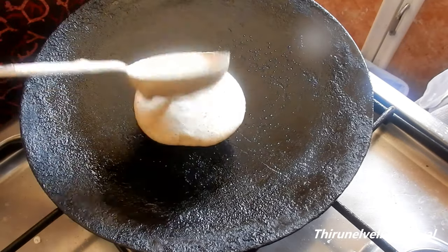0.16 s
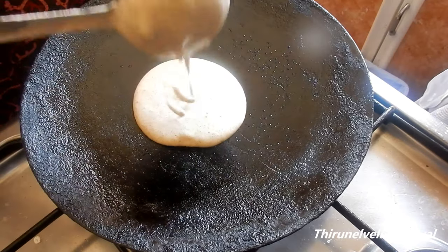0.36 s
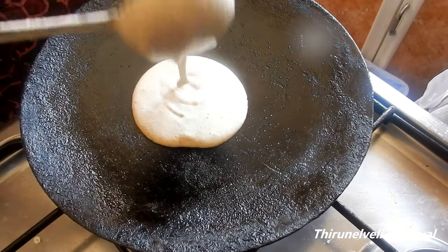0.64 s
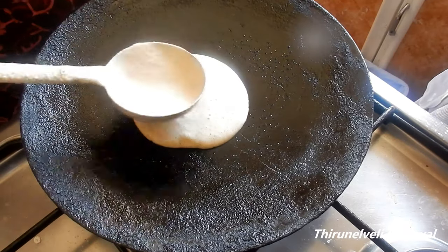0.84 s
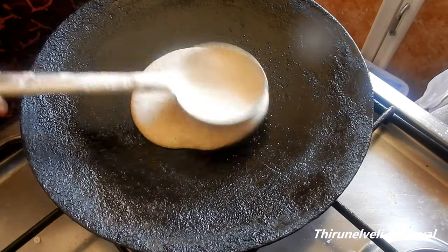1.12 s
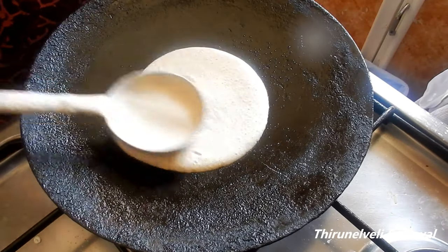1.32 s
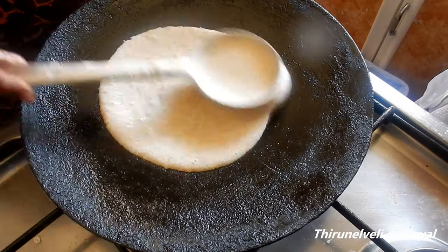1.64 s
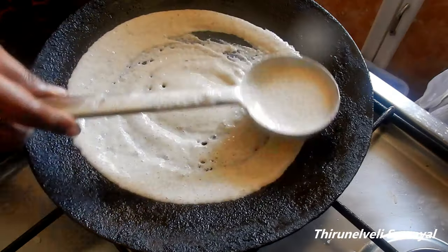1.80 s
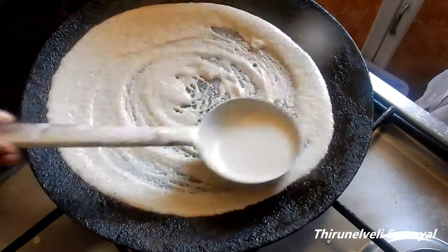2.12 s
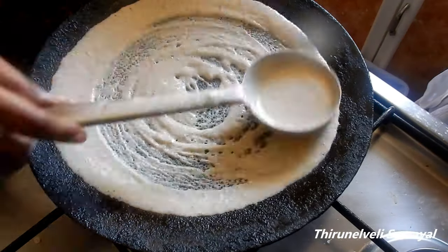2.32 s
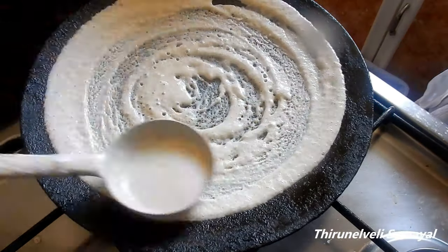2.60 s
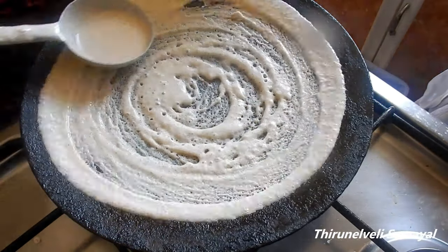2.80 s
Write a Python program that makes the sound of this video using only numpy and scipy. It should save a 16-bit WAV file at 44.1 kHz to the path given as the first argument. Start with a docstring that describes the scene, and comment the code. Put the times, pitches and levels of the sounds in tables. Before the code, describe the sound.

Batter sizzles close by on a hot iron griddle, bubbling and spitting over a low rumble. From about 1.3 seconds the bubbling eases and a fine crackle grows. Near 1.8 seconds the sound cuts out for an instant, returning quieter with a puff of steam. Until about 3 seconds a steel ladle rubs through the hissing batter with faint sliding tones and three short rim scrapes around 2.2 seconds.

```python
"""Wet batter sizzles on a hot iron griddle: countless steam bubbles burst and ring the iron, droplets
spit, a low rumble runs beneath. From about 1.3 s the boil eases and a fine crackle grows.
At 1.77 s the sound breaks off for an instant, then resumes quieter and thinner with a flash of steam:
a steel ladle circles over the batter, rubbing the iron with faint singing glides and short rim
scrapes, while the thin layer hisses."""
import sys
import numpy as np
from scipy import signal
from scipy.fft import rfft, irfft
from scipy.io import wavfile
from scipy.ndimage import uniform_filter1d

SR = 44100
rng = np.random.default_rng(int(sys.argv[2]) if len(sys.argv) > 2 else 0)


def file_out(sig):
    """Save sig as 16-bit WAV at sys.argv[1]."""
    # one column per channel
    cols = np.atleast_2d(sig).T
    # limit, then scale
    lim = np.clip(cols, -1, 1)
    pcm = np.round(lim * 32767).astype(np.int16)
    wavfile.write(sys.argv[1], SR, pcm)


N = 130095

# boil strength (time [s], large bubbles [dB], small bubbles [dB], rumble [dB])
BOIL_LEVELS = [(0, -27, -31, -41), (.09, -27, -33, -40.5), (.31, -26, -32, -39.5), (.45, -29, -35, -43),
               (.62, -28.5, -35.5, -41.5), (.76, -26.5, -34, -38.5), (.88, -29.5, -34.5, -42),
               (1.0, -27.5, -36, -41.5), (1.07, -29, -35.5, -43), (1.24, -27, -34.5, -40),
               (1.35, -31.5, -34, -45), (1.48, -34, -35.5, -48.5), (1.77, -33, -36, -49.5)]


def sizzle():
    """Steam bubbles burst in flurries and ring the iron; small ones fizz above; the boil surges twice."""
    # large-bubble spectrum (frequency [Hz], relative level [dB])
    large_spectrum = [(300, -28.5), (680, -13), (820, -4), (1300, -3), (1480, -4), (2100, -1.5),
                      (3300, -0.5), (3800, -11.5), (5000, -23.5), (9000, -61)]
    # small-bubble spectrum (frequency [Hz], relative level [dB])
    small_spectrum = [(2500, -28), (3900, -4.5), (4400, 0.5), (5800, -2), (7500, -7.5), (10200, -17.5),
                      (12000, -25), (16000, -30)]
    # griddle resonances (frequency [Hz], bandwidth [Hz], gain [dB])
    iron_modes = [(898, 22, -8), (1228, 34, -2.5), (1336, 44, -2), (1688, 48, 1.5), (2100, 51, -1.5),
                  (2330, 17, 5.5), (4300, 75, -6.5)]
    # boiling surges (start [s], length [s], level [dB])
    surges = [(.02, 0.36, -28.5), (.93, .14, -30.5)]
    # surge passband (frequency [Hz], bandwidth [Hz], gain [dB])
    surge_band = [(2220, 870, 0)]
    flurry_db = walk(79.92)
    large = ring(colour(bursts(9000, scatter_db=4, spread=0.039), large_spectrum), iron_modes)
    small = ring(colour(bursts(7000, scatter_db=5.5, spread=0.1), small_spectrum), iron_modes)
    surge_noise = colour(rng.standard_normal((1, N)), large_spectrum)
    surge = ring(resonate(surge_noise, surge_band), iron_modes)
    return (unit(large) * undb(curve(BOIL_LEVELS, column=1) + 1.04 * flurry_db)
            + unit(small) * undb(curve(BOIL_LEVELS, column=2) + flurry_db + 0.58 * walk(120))
            + unit(surge) * undb(flurry_db) * swells(surges))


def crackle():
    """Sharp snaps at the batter's edge, sparser when weak, and a few louder spitting droplets."""
    # crackle, growing as batter is pushed on to bare iron (time [s], level [dB])
    snap_levels = [(0, -51), (.85, -47.5), (.95, -57), (1.18, -56), (1.3, -39), (1.5, -41), (1.65, -45),
                   (1.77, -41.5)]
    # snap and droplet spectrum (frequency [Hz], gain [dB])
    snap_spectrum = [(800, -11), (3000, 6), (6000, 5), (9000, 7), (12000, 1.5), (16000, -4.5)]
    # droplets (time [s], peak before filtering [dB])
    spits = [(.021, -29), (.129, -26), (.229, -20), (.273, -23), (.359, -22), (.394, -28), (.432, -26),
             (.499, -16), (.516, -22), (.666, -27.5), (.848, -23), (1.025, -22.5), (1.158, -22.5),
             (1.218, -18.5), (1.424, -20), (1.444, -23), (1.502, -20), (1.542, -27), (1.638, -25),
             (1.726, -27)]
    max_snaps_per_s, spit_decay_s = 650, 0.00072
    strength = undb(curve(snap_levels, column=1))
    snaps_per_s = max_snaps_per_s * strength / strength.max()
    clicks = bursts(snaps_per_s, scatter_db=4.5, spread=0.2) / np.sqrt(snaps_per_s)
    snaps = unit(colour(clicks, snap_spectrum))
    drops, age_s = np.zeros((2, N)), np.arange(SR // 100) / SR
    for (start_s, db), pan in zip(spits, rng.standard_normal(len(spits))):
        spit = rng.standard_normal(len(age_s)) * np.exp(-age_s / spit_decay_s)
        gains = undb(db + 2 * pan * np.array([[1], [-1]]))
        i = int(start_s * SR)
        drops[:, i:i + len(age_s)] += gains * spit / np.abs(spit).max()
    return snaps * strength + colour(drops, snap_spectrum)


def ladle():
    """The ladle's bowl rubs through grainy batter over the rough iron."""
    # circling stroke (time [s], rub [dB], grit [dB])
    stroke = [(1.83, -48.5, -52), (1.875, -43.5, -47.5), (1.895, -49, -53.5), (1.97, -49, -60),
              (2.07, -51, -56.5), (2.125, -44, -52), (2.215, -43.5, -49), (2.24, -49.5, -56),
              (2.27, -44.5, -51), (2.7, -45, -53), (2.785, -48.5, -50), (2.85, -44.5, -52.5),
              (2.95, -46, -50)]
    # rub spectrum (frequency [Hz], relative level [dB])
    rub_spectrum = [(350, -25.5), (570, -14), (670, -5), (820, -7.5), (1060, -5.5), (1700, 4.5),
                    (2300, -4.5), (2900, -5), (3500, -9.5), (10000, -42)]
    # grit spectrum (frequency [Hz], relative level [dB])
    grit_spectrum = [(2000, -36), (3600, 0), (4100, 3.5), (6200, 0.5), (7000, -7.5), (9000, -18),
                     (16000, -39)]
    # ladle resonances (frequency [Hz], bandwidth [Hz], gain [dB])
    ladle_modes = [(470, 40, -3), (673, 30, -0.5), (960, 17, 10), (1306, 29, 1), (1630, 33, -3.5),
                   (2824, 110, 6)]
    low_cut_hz = 300
    catch_db = walk(60)
    rub = ring(colour(bursts(6000, scatter_db=4, spread=0.13), rub_spectrum), ladle_modes)
    rub = signal.sosfilt(signal.butter(6, low_cut_hz, "high", fs=SR, output="sos"), rub)
    grit = colour(bursts(6000, scatter_db=2.5, spread=0.13), grit_spectrum)
    return (unit(rub) * undb(curve(stroke, column=1) + catch_db)
            + unit(grit) * undb(curve(stroke, column=2) + catch_db))


def hiss():
    """The freshly spread layer hisses: a bright flash of steam, then an even simmer."""
    # steam spectrum (frequency [Hz], relative level [dB])
    steam_spectrum = [(4000, -29), (7000, -15), (7700, -4.5), (10500, -5), (13000, 3), (16000, -5)]
    # simmer spectrum (frequency [Hz], relative level [dB])
    simmer_spectrum = [(3000, -29), (6800, -9), (7600, -3), (8600, -2), (10000, 1.5), (11500, -1),
                       (13000, -1.5), (16000, -8)]
    # simmer strength (time [s], level [dB])
    simmer_levels = [(2.06, -48.5), (2.125, -42.5), (2.21, -42.5), (2.24, -48), (2.28, -44.5),
                     (2.95, -45.5)]
    peak_s, peak_db, rise_db_per_s, fall_db_per_s = 1.846, -34, 80, 82
    age_s = times() - peak_s
    flash_db = peak_db + np.minimum(rise_db_per_s * age_s, -fall_db_per_s * age_s)
    steam = unit(colour(bursts(9000, scatter_db=6.0, spread=0.045), steam_spectrum))
    simmer = unit(colour(bursts(12000, scatter_db=4, spread=0.055), simmer_spectrum))
    return steam * undb(flash_db) + simmer * undb(curve(simmer_levels, column=1) + .5 * walk(40))


def singing():
    """Narrow friction tones slide as the ladle moves, building slowly and dying faster."""
    # friction tones (start [s], length [s], from [Hz], to [Hz], level [dB])
    glides = [(1.92, .22, 910, 805, -63), (2.07, .25, 1392, 1290, -49), (2.17, .27, 790, 632, -54.5),
              (2.43, .33, 1420, 1790, -42.5), (2.64, .13, 3780, 4100, -52.5)]
    width_hz, roughness = 50, .33
    t, tones = times(), np.zeros(N)
    for start_s, length_s, from_hz, to_hz, db in glides:
        along = np.clip((t - start_s) / length_s, 0, 1)
        phase = 2 * np.pi * np.cumsum(from_hz + (to_hz - from_hz) * along) / SR
        waver = 1 + roughness * (walk(2 * width_hz) + 1j * walk(2 * width_hz))
        tone = unit((waver * np.exp(1j * phase)).real)
        tones += undb(db) * np.sin(np.pi * along ** 2) * tone
    return tones


def scrapes():
    """The ladle's rim catches bare iron and rasps briefly."""
    # rim contacts (start [s], length [s], level [dB])
    contacts = [(2.112, 0.051, -47), (2.17, .06, -50), (2.258, 0.027, -48.5)]
    # rim resonances (frequency [Hz], bandwidth [Hz], gain per pass [dB])
    rim_modes = [(2920, 320, 0), (6080, 370, 1)]
    rasp = resonate(resonate(rng.standard_normal(N), rim_modes), rim_modes)
    return unit(rasp) * swells(contacts)


def rumble():
    """Low flutter of the burner and the boiling under the batter."""
    # rumble spectrum (frequency [Hz], relative level [dB])
    spectrum = [(48, -32), (65, -9), (170, 2), (240, -6.5), (285, -1), (360, -5), (600, -4), (900, -25),
                (2000, -46)]
    flutter = unit(colour(bursts(9000, scatter_db=2.5, spread=0.27), spectrum))
    return flutter * undb(curve(BOIL_LEVELS, column=3) + walk(34.96))


def kitchen(x):
    """Short reflections from hard walls, mostly shared by both sides."""
    t60_s, delay_s, wet_db = 0.28, .003, -13
    t = np.arange(SR // 3) / SR
    mid, side = rng.standard_normal((2, len(t))) * undb(-60 * t / t60_s) * (t > delay_s)
    tail = (mid + 0.14 * side * np.array([[1], [-1]])) / np.sqrt(np.sum(mid ** 2))
    return x + undb(wet_db) * signal.fftconvolve(x, tail, axes=1)[:, :N]


def widen(x, width, taps):
    """Scattering shifts the phase between left and right."""
    scatter = np.fft.fftshift(irfft(1j * rng.choice([-1, 1], taps // 2 + 1)))
    side = signal.fftconvolve(x.mean(axis=0), scatter)[taps // 2:taps // 2 + N]
    return x + irfft(rfft(side) * bin_gains(width, N), N) * np.array([[1], [-1]])


def bursts(rate_per_s, scatter_db, spread):
    """Random impulses of uneven size, each with its own pan."""
    hit = rng.random(N) < rate_per_s / SR
    size = undb(scatter_db * np.minimum(rng.standard_normal(N), 2)) * rng.choice([-1, 1], N)
    side = spread * rng.standard_normal(N)
    return unit(hit * size * np.array([1 + side, 1 - side]))


def bin_gains(spectrum, size):
    """Gain per FFT bin, interpolated in dB over log frequency."""
    hz, db = np.array(spectrum, float).T
    return undb(np.interp(np.log(np.fft.rfftfreq(size, 1 / SR) + 1), np.log(hz), db))


def colour(x, spectrum, taps=4096):
    """Minimum-phase filter with the given spectrum."""
    cepstrum = irfft(np.log(bin_gains(spectrum, taps)))
    cepstrum[1:taps // 2] *= 2
    cepstrum[taps // 2 + 1:] = 0
    impulse = irfft(np.exp(rfft(cepstrum)))
    return signal.fftconvolve(x, impulse[None], axes=1)[:, :N]


def resonate(x, modes):
    """Parallel band-pass resonators."""
    return sum(undb(db) * signal.lfilter(*signal.iirpeak(hz, hz / width_hz, fs=SR), x)
               for hz, width_hz, db in modes)


def ring(x, modes):
    """The sound plus the resonances it excites."""
    return x + resonate(x, modes)


def walk(rate_hz):
    """Smooth random wander, rms 1."""
    step = max(int(SR / rate_hz), 2)
    held = np.repeat(rng.standard_normal(N // step + 2), step)
    return unit(uniform_filter1d(held, step)[step // 2:N + step // 2])


def swells(table):
    """One half-sine envelope per event."""
    return sum(undb(db) * np.sin(np.pi * np.clip((times() - start_s) / length_s, 0, 1))
               for start_s, length_s, db in table)


def curve(table, column):
    """One table column, interpolated linearly in time."""
    rows = np.array(table, float)
    return np.interp(times(), rows[:, 0], rows[:, column])


def times():
    """Sample times [s]."""
    return np.arange(N) / SR


def unit(x):
    """Scale to rms 1."""
    return x / np.sqrt(np.mean(x ** 2))


def undb(db):
    """Decibels to gain."""
    return 10 ** (np.asarray(db) / 20)


def scene():
    """Loud sizzling, an abrupt gap, then the quieter spreading; both slightly to the left."""
    # stereo width of the sizzling (frequency [Hz], side gain [dB])
    sizzling_width = [(4500, -20.5), (9000, -8.5), (14000, -6)]
    # stereo width of the spreading (frequency [Hz], side gain [dB])
    spreading_width = [(600, -4.5), (1500, -12.5), (4500, -10.5), (8000, -25)]
    break_s, fade_out_s, resume_s, fade_in_s = 1.769, 0.0023, 1.826, 0.0086
    tail_db, tail_fall_db_per_s = -20, 1000  # the sizzle dies away into the gap
    sizzle_left_db, crackle_left_db, hiss_left_db = 0.95, 3, 1.3
    t, lean = times(), np.array([[.5], [-.5]])
    tail = undb(tail_db - tail_fall_db_per_s * np.maximum(t - break_s, 0))
    before_gap = np.maximum(np.clip((break_s - t) / fade_out_s + 1, 0, 1), tail)
    after_gap = np.clip((t - resume_s) / fade_in_s, 0, 1)
    sizzling = kitchen(sizzle() * undb(sizzle_left_db * lean) + crackle() * undb(crackle_left_db * lean))
    spreading = kitchen(ladle() + singing() + scrapes() + hiss() * undb(hiss_left_db * lean))
    return (before_gap * (widen(sizzling, sizzling_width, taps=32) + rumble())
            + after_gap * widen(spreading, spreading_width, taps=1024))


def record(dry):
    """Steep low-pass on the top treble."""
    top_hz = 16050
    return signal.sosfilt(signal.ellip(10, .2, 80, top_hz, fs=SR, output="sos"), dry)


dry = scene()
out = record(dry)
file_out(out)
```